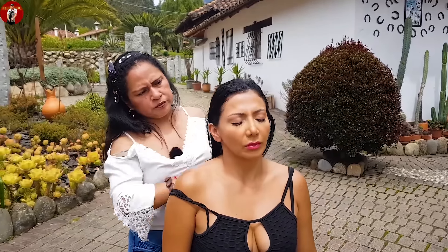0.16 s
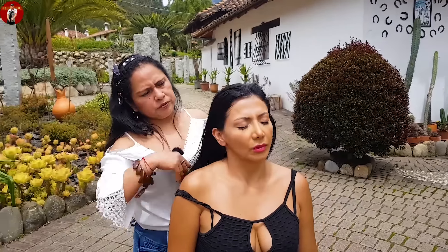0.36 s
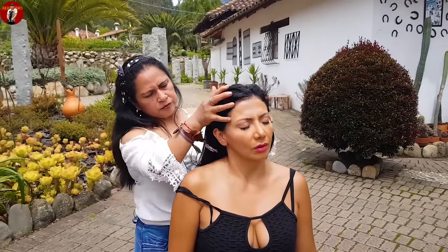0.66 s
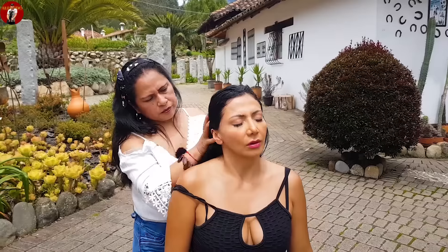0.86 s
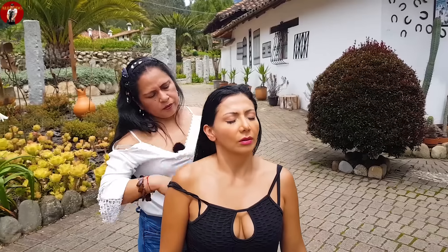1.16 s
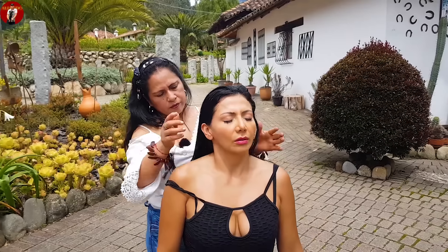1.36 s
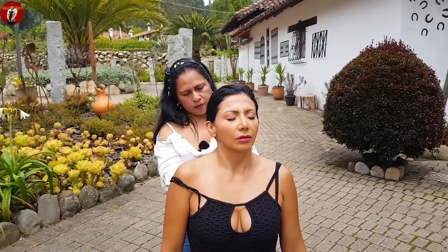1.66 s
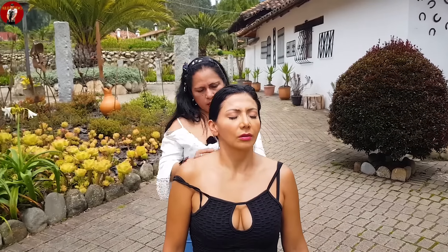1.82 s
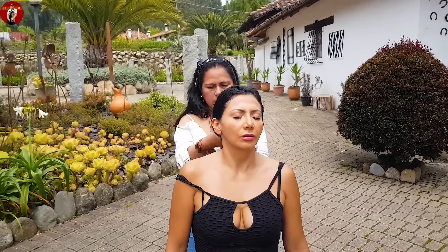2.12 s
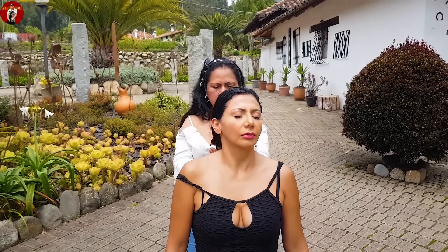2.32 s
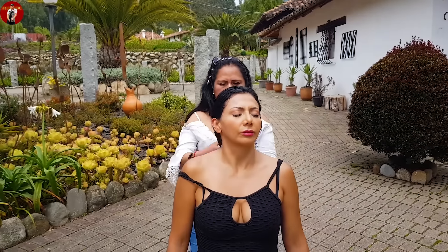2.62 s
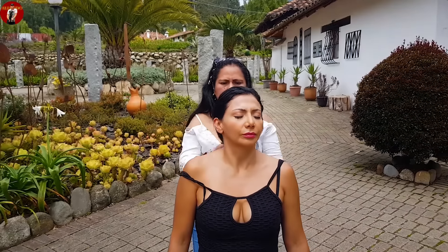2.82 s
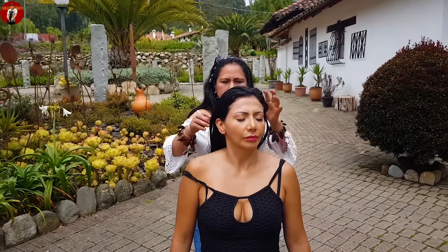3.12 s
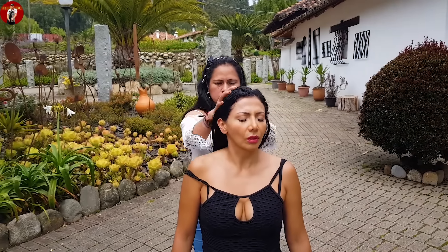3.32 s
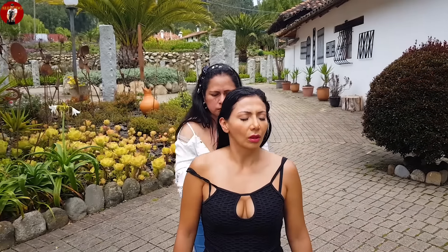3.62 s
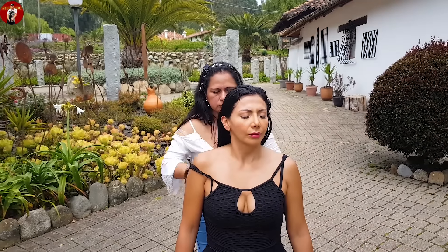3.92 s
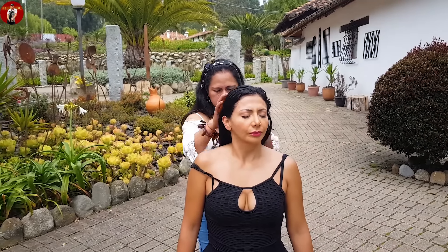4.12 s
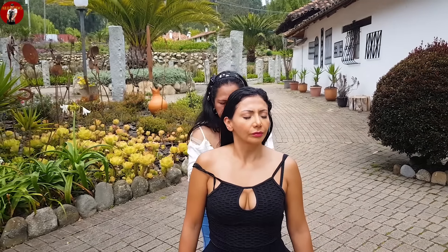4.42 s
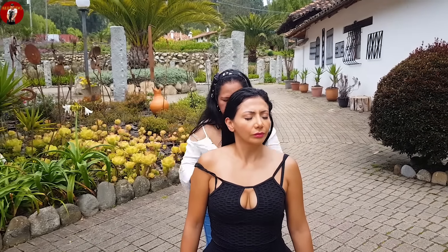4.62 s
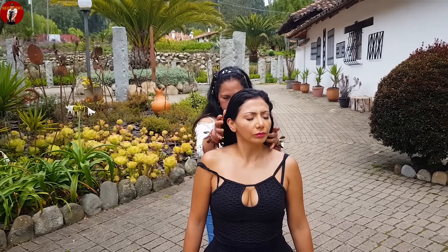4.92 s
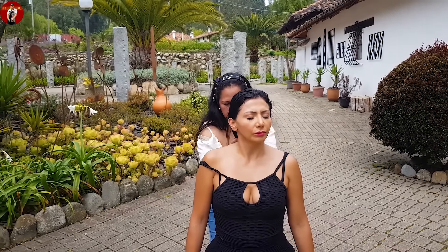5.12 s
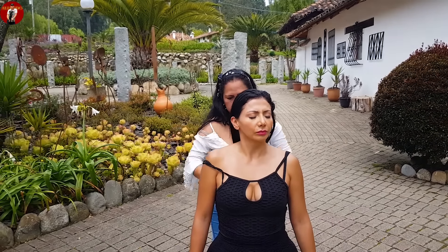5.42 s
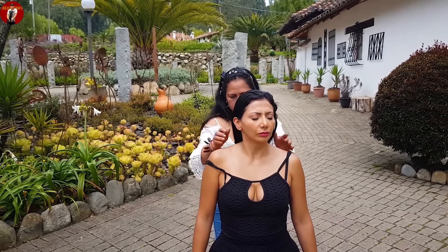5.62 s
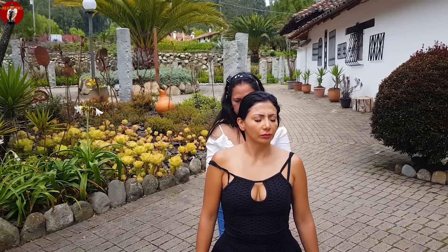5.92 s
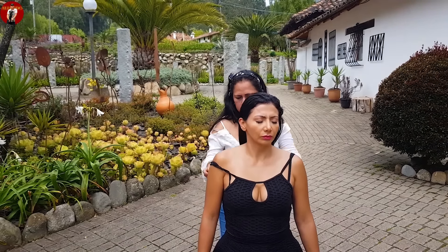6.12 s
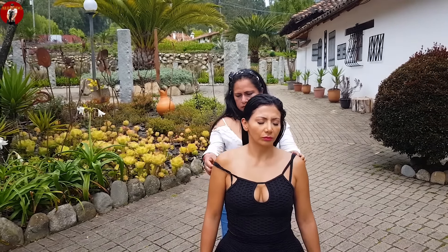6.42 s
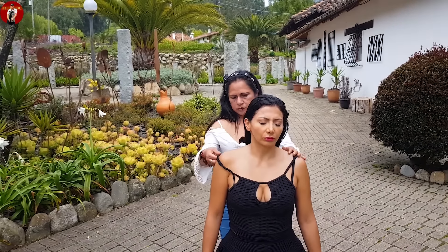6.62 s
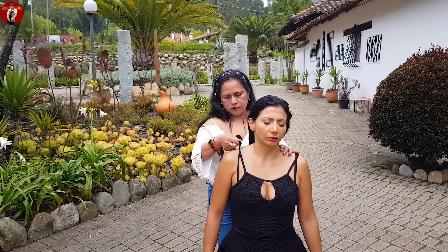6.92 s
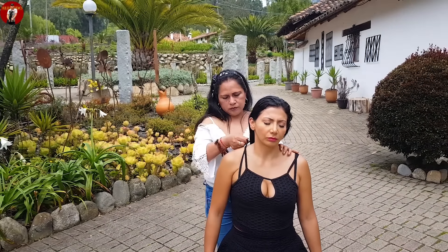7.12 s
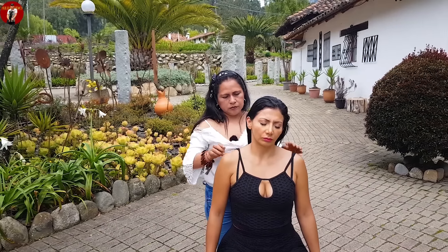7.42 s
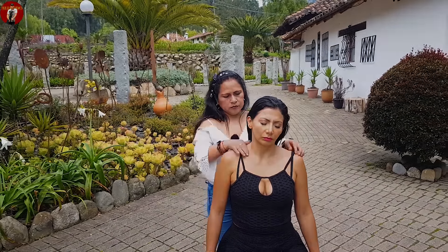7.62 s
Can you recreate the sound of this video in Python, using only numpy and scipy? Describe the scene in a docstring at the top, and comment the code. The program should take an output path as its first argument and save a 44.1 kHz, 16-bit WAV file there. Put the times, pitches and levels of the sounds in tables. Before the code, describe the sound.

Fingers rub through long hair very close to the microphone, crisp crackling ticks and rustles in bursts, over soft outdoor air and a faint distant hum.

```python
"""Hands in long hair

Hands rub through long hair and over a scalp, close to a clip-on microphone in a quiet garden.
Strands catch and slip under the fingers: each slip is a tick, made of decaying sines and a snap of noise.
Between the ticks, crowds of small slips crackle and filtered noise hisses as hair slides over hair.
Palms brush by as dull noise and bracelet beads clack as decaying sines.
Behind them lie the soft outdoor air, shaped noise, and the wavering tones of a far machine."""
import sys
import numpy as np
from scipy import signal
from scipy.fft import rfft, irfft
from scipy.io import wavfile
from scipy.ndimage import uniform_filter1d

SR = 44100
rng = np.random.default_rng(int(sys.argv[2]) if len(sys.argv) > 2 else 0)


def master_out(mix):
    """Clip the mix to full scale and print it as 16-bit PCM to the path in sys.argv[1]."""
    frames = np.transpose(np.atleast_2d(mix))
    ceiling = np.clip(frames, -1, 1)
    pcm = np.round(ceiling * 32767).astype(np.int16)
    wavfile.write(sys.argv[1], SR, pcm)


N = 342216
TIME = np.arange(N) / SR


def gain_of(db):
    """Decibels to amplitude."""
    return 10 ** (np.asarray(db) / 20)


def evened(x):
    """Scales each row to rms 1."""
    return x / np.sqrt(np.mean(x ** 2, axis=-1, keepdims=True) + 1e-20)


def curve(points, s):
    """Reads a table of (t/s, value) at the times s."""
    return np.interp(s, *np.transpose(points))


def coloured(x, spectrum):
    """Filters each row by a table of (f/Hz, level/dB), read along log frequency."""
    hz, db = np.transpose(spectrum)
    bins = np.fft.rfftfreq(x.shape[-1], 1 / SR)
    response = gain_of(np.interp(np.log(bins + 1), np.log(hz), db))
    return irfft(rfft(x) * response, x.shape[-1])


def drift(hz):
    """Slow complex chance of rms 1, mostly slower than hz."""
    noise = rng.standard_normal(N) + 1j * rng.standard_normal(N)
    slowed = np.fft.ifft(noise / (1 + (np.fft.fftfreq(N, 1 / SR) / hz) ** 2))
    return slowed / np.std(slowed)


def placed(starts, sounds):
    """Sums short sounds (rows) into one track, each at its start time."""
    first = np.round(np.maximum(starts, 0) * SR).astype(int)
    at = first[:, None] + np.arange(sounds.shape[1])
    return np.bincount(at.ravel(), sounds.ravel(), N)[:N]


# Loud or isolated slips of hair, close to the microphone:
# t/s, level/dB (rms of the first 4 ms), ring f/Hz
SINGLE_SLIPS = [(0.303, -25.5, 5160), (0.526, -21, 4980), (0.55, -25, 6600), (0.7666, -21.5, 7100),
                (0.7818, -27, 5400), (0.8581, -28, 3470), (0.864, -23.5, 5780), (0.923, -20.5, 5320),
                (1.2942, -27, 4380), (1.457, -23.5, 4770), (1.5692, -20.5, 4690), (1.6071, -15, 5800),
                (1.6676, -17, 5010), (1.735, -24.5, 5900), (1.795, -27.5, 4420), (2.232, -22.5, 5370),
                (2.2558, -22, 4870), (2.3305, -21.5, 4900), (2.4955, -28, 5600), (2.6499, -20, 4280),
                (2.7111, -22.5, 5230), (2.717, -19.5, 5340), (2.7911, -18, 4870), (2.7948, -20, 4040),
                (2.809, -21, 5400), (2.9273, -20.5, 5110), (3.0877, -26, 4430), (3.315, -23.5, 6870),
                (3.3854, -26, 5000), (3.4268, -20.5, 6060), (3.4571, -18.5, 5800), (3.4615, -19.5, 5100),
                (3.513, -23.5, 6000), (3.603, -23.5, 6550), (4.189, -21, 4850), (4.1974, -18, 6050),
                (4.2234, -20, 5050), (4.235, -16, 7540), (4.2435, -16.5, 5720), (4.2472, -9, 5810),
                (4.372, -21.5, 4760), (4.396, -20.5, 5840), (4.5823, -24, 5370), (4.9726, -23, 6270),
                (4.9834, -23.5, 6000), (5.0748, -16.5, 7100), (5.0918, -23, 4640), (5.1931, -26, 5100),
                (5.2139, -25, 5900), (5.4536, -30.5, 4940), (5.673, -26.5, 5560), (5.8779, -20.5, 5940),
                (6.256, -31.5, 5100), (6.4185, -32.5, 4460), (7.226, -25, 4440), (7.2474, -24.5, 5640),
                (7.745, -28.5, 5970)]


def slips():
    """Taut strands snap free of a finger; the strongest ring the purest."""
    s, db, hz = np.transpose(SINGLE_SLIPS)
    impure_db = -6.5 - np.maximum(db[:, None] + 22.5, 0)
    snap_db = impure_db + 0.12 * force_db(s + BITE_S)[:, None]
    sounds = ticks(hz, t60=0.01, side_db=impure_db, snap_db=snap_db)
    return placed(s, gain_of(db)[:, None] * sounds)


# Strokes of the fingers through the hair, and one lone tick at 4.858 s, close by:
# start t/s, length/s, crackle level/dB, f/Hz of the favoured ring
FINGER_CONTACTS = [(0.027, 0.12, -35, 5060), (0.188, 0.35, -45, 5200), (0.466, 0.012, -35.5, 5570),
                   (0.521, 0.23, -34.5, 5500), (0.777, 0.096, -31, 5460), (0.916, 0.29, -38.5, 5370),
                   (1.304, 0.12, -37, 4900), (1.452, 0.3, -34.5, 5340), (1.764, 0.17, -37.5, 5485),
                   (1.987, 0.098, -37, 5430), (2.143, 0.26, -37.5, 5230), (2.493, 0.15, -40, 5300),
                   (2.635, 0.11, -36.5, 5200), (2.771, 0.095, -34, 5000), (2.91, 0.05, -35.5, 5000),
                   (3.049, 0.071, -40.5, 4840), (3.162, 0.047, -36, 5580), (3.278, 0.074, -34, 5720),
                   (3.421, 0.14, -36, 5770), (3.584, 0.037, -34, 5750), (3.7, 0.062, -43.5, 5890),
                   (3.925, 0.29, -37, 5194), (4.179, .12, -32.5, 5760), (4.341, 0.089, -34.5, 5500),
                   (4.453, .13, -42, 5160), (4.667, .1, -41.5, 5300), (4.858, 0.0044, -44.5, 7300),
                   (4.926, 0.08, -36.5, 6480), (4.986, 0.28, -33.5, 5730), (5.38, 0.047, -41.5, 5230),
                   (5.454, 0.044, -45, 4700), (5.702, 0.26, -33.5, 5310), (5.973, 0.087, -47, 5460),
                   (6.176, 0.17, -46.5, 5150), (6.386, 0.13, -45.5, 4880), (6.545, 0.083, -46, 5040),
                   (6.91, 0.061, -46, 5340), (7.086, 0.016, -44.5, 5640), (7.437, 0.15, -48.5, 4800),
                   (7.606, 0.11, -46.5, 5200)]
CATCH_DB = 8.5  # the first strand caught, over the crackle level of its row


def catches():
    """Where no single slip opens a row, a lighter tick does, as the fingers catch a first strand."""
    s, _, db, hz = np.transpose(FINGER_CONTACTS)
    slip_times = np.transpose(SINGLE_SLIPS)[0]
    light = abs(s[:, None] - slip_times).min(axis=1) > .005
    heights = light * gain_of(db + CATCH_DB)
    return placed(s, heights[:, None] * ticks(hz, t60=0.015, side_db=-8, snap_db=-10))


# Resonances that the ticks of hair ring with: f/Hz, weight (how often and how strongly)
HAIR_RINGS = [(3900, 0.13), (4450, 0.98), (5000, 0.74), (5730, 0.71), (6420, 0.17), (7130, 0.47),
              (8220, 0.05)]


def ticks(ring_hz, t60, side_db, snap_db, rise_s=.00045, snap_s=0.00059,
          body_hz=3200, body_db=-7, low_hz=2300, size=560):
    """One row a tick: a main ring, the other resonances more weakly, and the wide snap of the release."""
    count = len(ring_hz)
    t = np.arange(size) / SR
    softness, crispness, fullness = rng.standard_normal((3, count, 1))
    weights, detunes, phases = rng.standard_normal((3, len(HAIR_RINGS), count, 1))
    burst = rng.standard_normal((count, size))

    onset = 1 - np.exp(-(t / (rise_s * np.exp(.5 * softness))) ** 2)
    fade = onset * gain_of(-60 * t / t60)
    main = evened(fade * np.sin(2 * np.pi * ring_hz[:, None] * t))

    side = 0
    for (hz, weight), strength, detune, phase in zip(HAIR_RINGS, weights, detunes, phases):
        cycles = hz * (1 + 0.032 * detune) * t + phase
        side = side + np.sqrt(weight) * strength * np.sin(2 * np.pi * cycles)

    release = onset * np.exp(-t / snap_s)
    snap = evened(coloured(burst, HAIR_COLOUR) * release) * gain_of(3.9 * np.tanh(crispness))
    # some ticks come from a thicker lock, which adds a short, lower body
    body = evened(release ** 2 * np.sin(2 * np.pi * body_hz * t))
    body = body * gain_of(body_db) * np.clip(fullness, 0, 1)

    tick = main + gain_of(side_db) * (evened(fade * side) + body) + gain_of(snap_db) * snap
    # thin strands radiate little bass
    tick = signal.sosfilt(signal.butter(2, low_hz, "high", fs=SR, output="sos"), tick)
    return tick / np.std(tick[:, :round(.004 * SR)], axis=1, keepdims=True)


def crackle(count=1500, order=3, crowding=0.34, spread_db=6.0, lag_s=0.0073, weaker_db=-4):
    """Many small slips, each setting off a short cascade; harder rubbing frees more strands."""
    when, luck, choice = rng.random((3, count, 1))
    size = rng.standard_normal((count, 1))
    detune, length, unevenness = rng.standard_normal((3, count * order))
    start = when * N / SR
    step = np.arange(order)
    lags = rng.exponential(lag_s, (count, order)) * (step > 0)
    s = (start + np.cumsum(lags, axis=1)).ravel()

    caught = luck < .5 * gain_of(crowding * force_db(start))
    cascade = caught * gain_of(spread_db * np.minimum(size, 1.4) + weaker_db * step)
    heights = cascade.ravel() * gain_of(2 * unevenness)

    # the slips of one cascade favour the same resonance, a higher one in a bright stroke
    choice = choice ** (brightness(start) ** -7)
    hz, weight = np.transpose(HAIR_RINGS)
    chosen_hz = hz[np.searchsorted(np.cumsum(weight), choice * weight.sum())]
    ring_hz = np.repeat(chosen_hz, order) * (1 + 0.016 * detune)
    t60 = .009 * np.exp(.35 * length[:, None])
    sounds = ticks(ring_hz, t60, side_db=-7, snap_db=-3.5 + 0.52 * force_db(s)[:, None])
    grains = placed(s, heights[:, None] * sounds)

    # the work of the hand is shared among the strands that slip at about the same moment
    window = signal.windows.hann(4401)  # about 0.1 s
    power = signal.fftconvolve(grains ** 2, window / window.sum(), "same")
    return grains / np.sqrt(abs(power) + 0.0016) * gain_of(rubbing_db(TIME))


# Colour of sliding hair and of the snap in a tick, heard close: f/Hz, relative level/dB
HAIR_COLOUR = [(300, -4), (1500, 5.5), (2900, -15.5), (4300, 14.5), (5900, 14.5), (7200, 1), (9000, 0.5),
               (12000, -6.5), (16000, -20.5)]


def slide(flutter_db=5, under_db=-14):
    """Hair sliding over hair: a faint uneven hiss in which each resonance flares and fades by itself."""
    hiss = evened(coloured(rng.standard_normal(N), HAIR_COLOUR))
    sing = np.zeros(N)
    for hz, weight in HAIR_RINGS:
        ring = np.sqrt(weight) * (drift(200) * np.exp(2j * np.pi * hz * TIME)).real
        sing += ring * gain_of(flutter_db * drift(22.0).real)
    rustle = evened((hiss + evened(sing)) * gain_of(flutter_db * drift(38).real))
    return rustle * gain_of(rubbing_db(TIME) + under_db + 0.19 * force_db(TIME))


def sticking(hold_s=0.0033, grip_s=0.0089, depth_db=-11):
    """Fingers grip before each contact and stick before each single slip: crackle and hiss dip briefly."""
    held = np.zeros(N)
    for table, wait in (FINGER_CONTACTS, grip_s), (SINGLE_SLIPS, hold_s):
        for s, *_ in table:
            held[max(round((s - wait) * SR), 0):round(s * SR)] = 1
    return gain_of(depth_db * uniform_filter1d(held, size=64))


# every contact bites quickly, slackens along its length and lets go
BITE_S, SLACKEN_DB, LET_GO_S = .008, 2, 0.018
# Light touch of the hands between strokes, on the hair and later on the shoulders:
# t/s, crackle level/dB
LIGHT_TOUCH = [(0, -52.5), (2.4, -45.5), (4.6, -45.5), (4.83, -60), (5.3, -45.5), (6.1, -57.5), (6.75, -54),
               (7.76, -52.5)]


def rubbing_db(s):
    """How hard the hands rub at the times s: the contacts' power added to that of the light touch."""
    start, length, db, _ = np.transpose(FINGER_CONTACTS)[:, :, None]
    t = TIME[::32]  # a coarse grid is enough for the hand
    age = t - start
    let_go = np.exp(-np.clip((age - length) / LET_GO_S, 0, 20))
    contact = np.clip(age / BITE_S, 0, 1) * let_go
    pressure = contact * gain_of(db - SLACKEN_DB * np.clip(age / length, 0, 1))
    power = np.sum(pressure ** 2, axis=0) + gain_of(curve(LIGHT_TOUCH, t)) ** 2
    return np.interp(s, t, 10 * np.log10(power))


def force_db(s):
    """Strength of the rubbing at the times s, against a firm stroke."""
    return rubbing_db(s) + 34


def brightness(s, usual_hz=5300):
    """Favoured ring of the latest contact at the times s, as a ratio to the usual ring."""
    start, _, _, hz = np.transpose(FINGER_CONTACTS)
    return hz[np.maximum(np.searchsorted(start, s) - 1, 0)] / usual_hz


# Bracelet beads knocking: t/s, level/dB (half the ring's starting amplitude), ring f/Hz, t60/s
BEAD_KNOCKS = [(0.4661, -36.5, 2580, 0.028), (0.4672, -40.5, 1660, 0.036), (0.568, -40.5, 2600, 0.031),
               (1.33, -48, 1700, 0.035), (5.075, -53, 1740, 0.066), (5.615, -43, 1700, 0.032),
               (6.645, -41, 2240, 0.0099)]


def beads(click_db=-2):
    """Small beads ring lower and longer than hair, with a dry click of contact."""
    s, db, hz, t60 = np.transpose(BEAD_KNOCKS)[:, :, None]
    t = np.arange(2048) / SR
    ring = np.sin(2 * np.pi * hz * t) * gain_of(-60 * t / t60)
    click_colour = [(300, 1), (1800, 14.5), (3000, -2), (16000, -45)]  # f/Hz, level/dB
    click = coloured(rng.standard_normal(ring.shape), click_colour)
    click = click * np.exp(-t / 0.00079) * np.tanh(t / 0.00011)
    return placed(s[:, 0], 2 * gain_of(db) * (ring + gain_of(click_db) * click))


# Soft brushes of a palm: middle t/s, half length/s, level/dB (at the middle, before flutter), centre f/Hz
PALM_BRUSHES = [(1.188, 0.086, -57.5, 800), (1.251, 0.0089, -43, 2800), (4.94, 0.092, -55, 680),
                (5.732, 0.23, -56, 650), (5.894, 0.041, -51, 1620)]


def palms(octave_db=-13):
    """A flat palm brushes by: a dull, uneven swell of noise around a centre pitch."""
    out = np.zeros(N)
    for s, half, db, hz in PALM_BRUSHES:
        colour = [(hz * 2. ** k, octave_db * abs(k) ** 1.5) for k in np.arange(-2, 2.5, .5)]
        swell = np.exp(-((TIME - s) / half) ** 2)
        out += gain_of(db) * swell * evened(coloured(rng.standard_normal(N), colour))
    return out * gain_of(6.4 * np.tanh(drift(60).real))


# Colour of the outdoor air around the microphone: f/Hz, relative level/dB
AIR_COLOUR = [(20, -16), (35, -15), (55, 0), (105, 1), (200, -4), (320, 5), (470, -6.5), (750, -7.5),
              (1100, -13), (2200, -18.5), (4000, -25), (11000, -36.5), (16000, -60)]
# Swell of the air, which the hum follows: t/s, rms level/dB of the air
AIR_SWELL = [(0, -48.5), (3.9, -50), (4.6, -52.5), (6.2, -53.5), (6.9, -51), (7.76, -50.5)]
# Hum of the far machine: f/Hz, rms level/dB (while the air is at -51 dB),
# waver as a share of the tone, waver rate f/Hz
MACHINE_HUM = [(57.5, -59.5, 1, 1.9), (132.5, -54.5, 0.64, 11), (265.7, -48, 0.23, 7.5), (398, -65, 1, 1.8),
               (529, -66.5, 1, 12), (796, -73, 1, 3), (1975, -75.5, 0.16, 5)]


def garden():
    """Soft air, shaped noise, and the hum of a far machine, tones that waver on their way."""
    air_db = curve(AIR_SWELL, TIME)
    air = gain_of(air_db) * evened(coloured(rng.standard_normal(N), AIR_COLOUR))
    hum = np.zeros(N)
    for hz, db, waver, rate in MACHINE_HUM:
        tone = (1 + waver * drift(rate)) * np.exp(2j * np.pi * hz * TIME)
        hum += gain_of(db) * evened(tone.real)
    return air + hum * gain_of(0.97 * (air_db + 51))


def scene():
    """All sounds at the one microphone."""
    rubbing = sticking() * (crackle() + slide())
    return (slips() + catches() + rubbing + palms() + beads() + garden())[None]


def record(dry, edge_hz=15900):
    """A hard limit on the loudest peaks, then a steep low-pass."""
    limited = np.clip(dry, -.93, .93)
    low_pass = signal.firwin(255, edge_hz, window=("kaiser", 9), fs=SR)
    return signal.oaconvolve(limited, low_pass[None], "same")


dry = scene()
out = record(dry)
master_out(out)
```